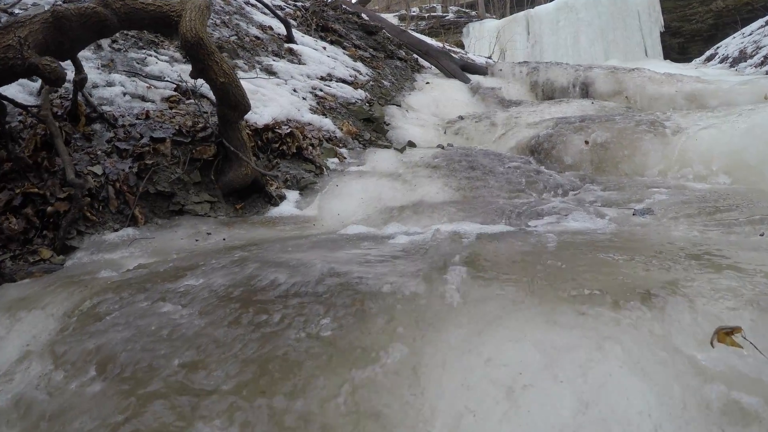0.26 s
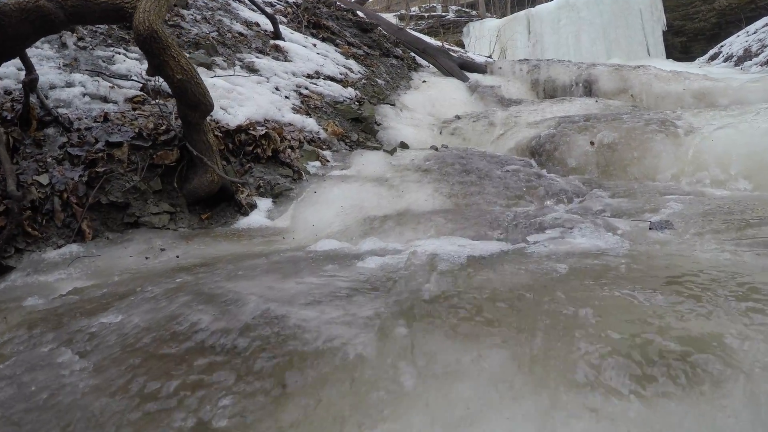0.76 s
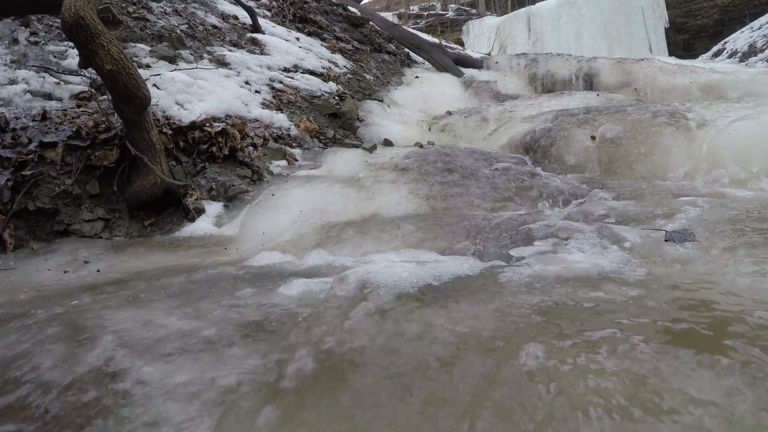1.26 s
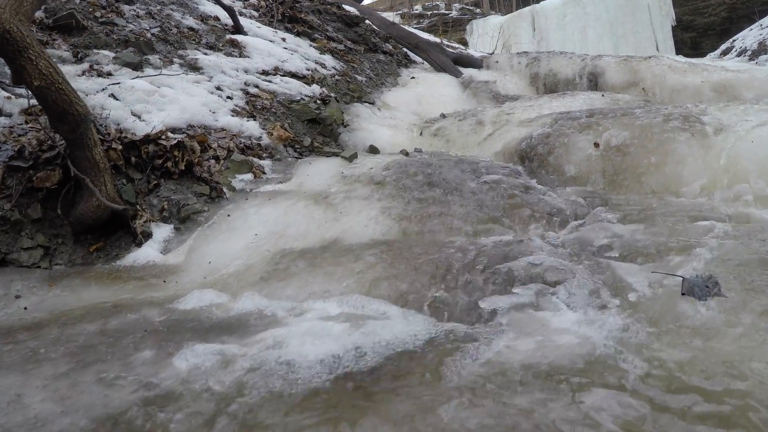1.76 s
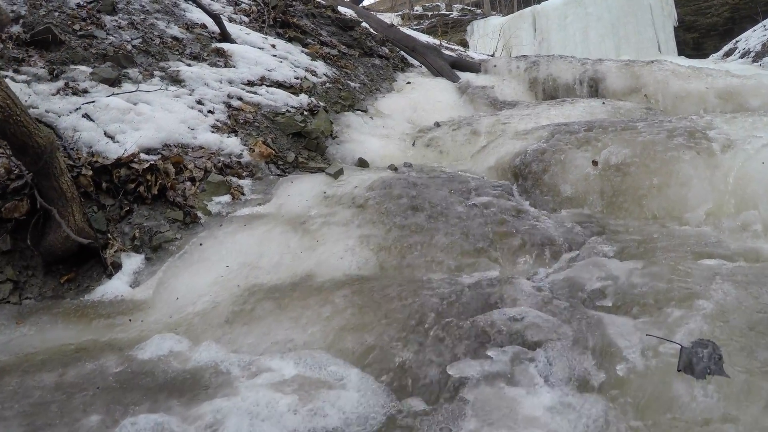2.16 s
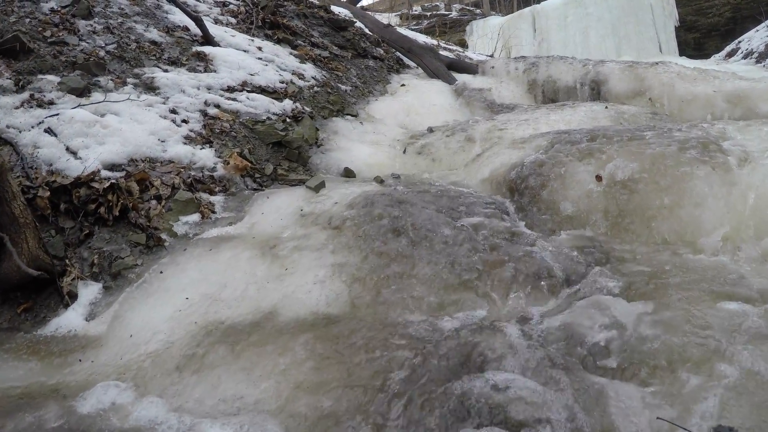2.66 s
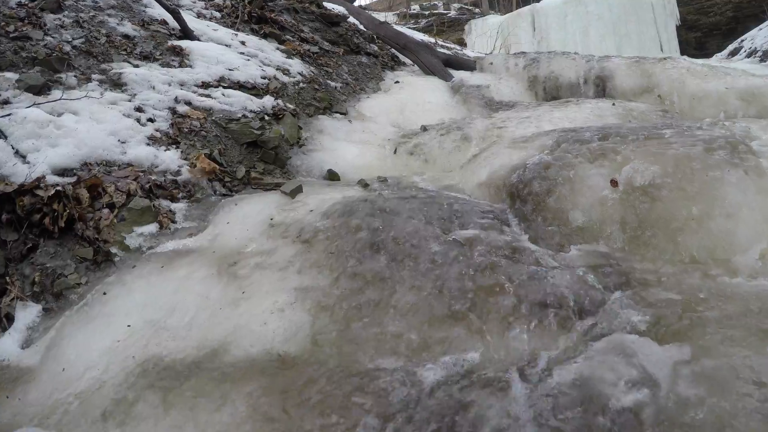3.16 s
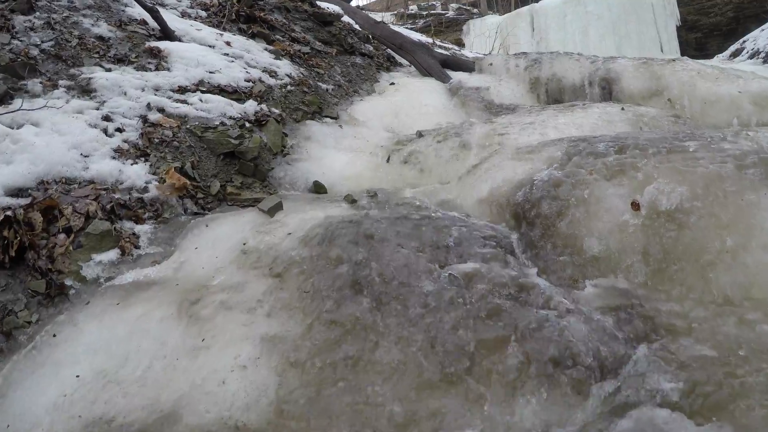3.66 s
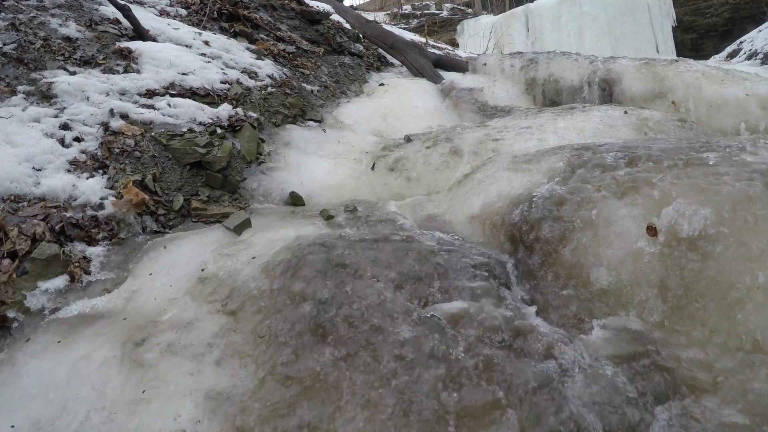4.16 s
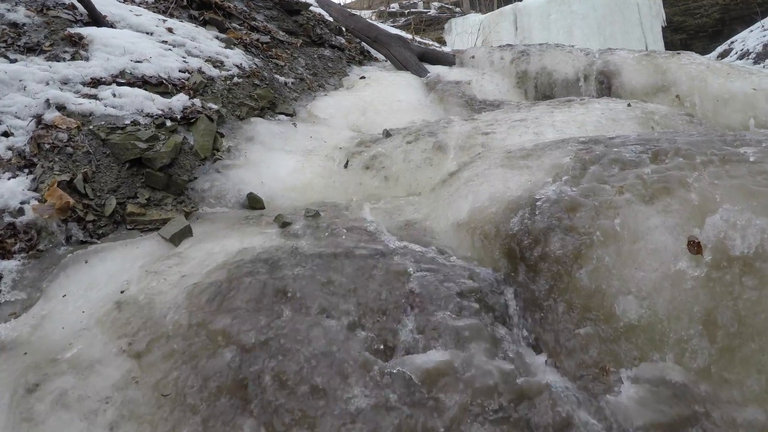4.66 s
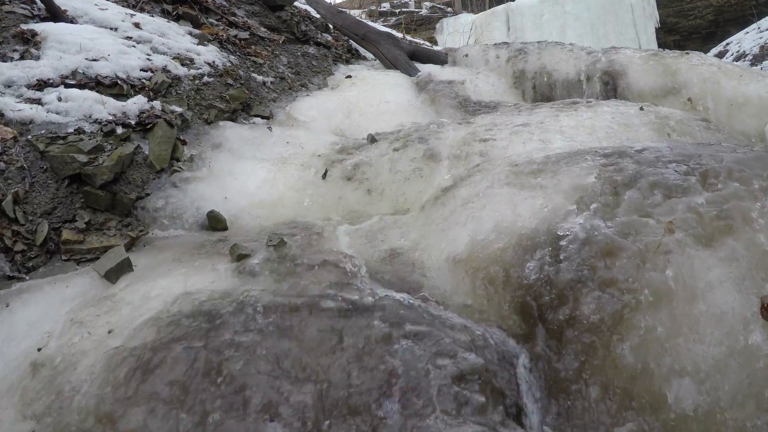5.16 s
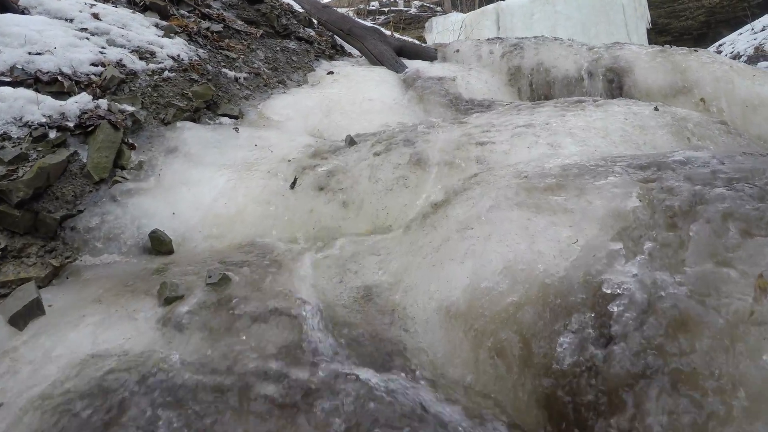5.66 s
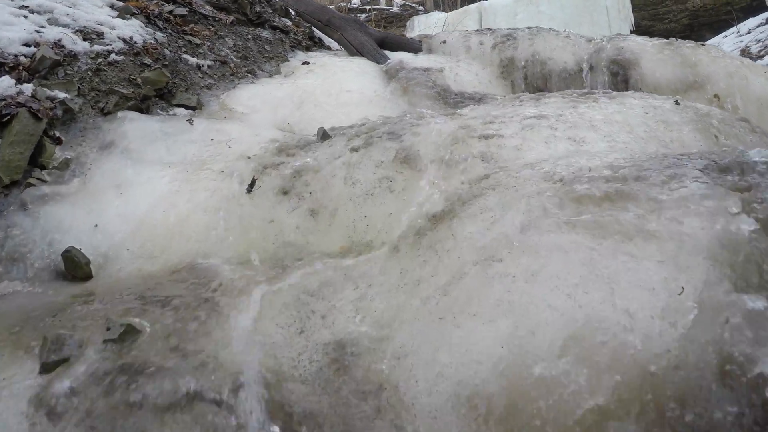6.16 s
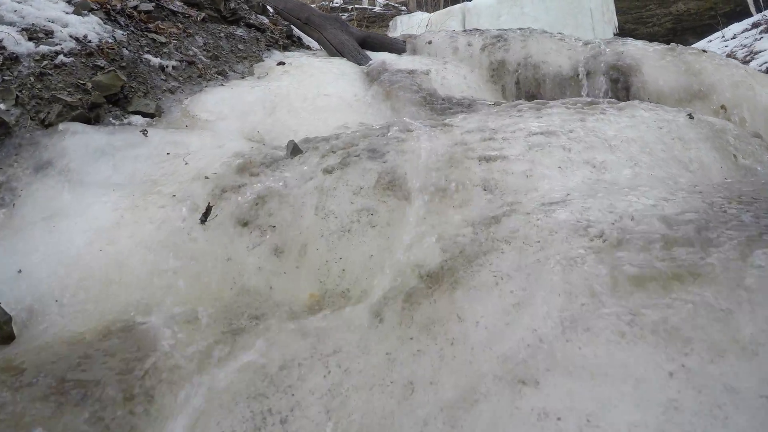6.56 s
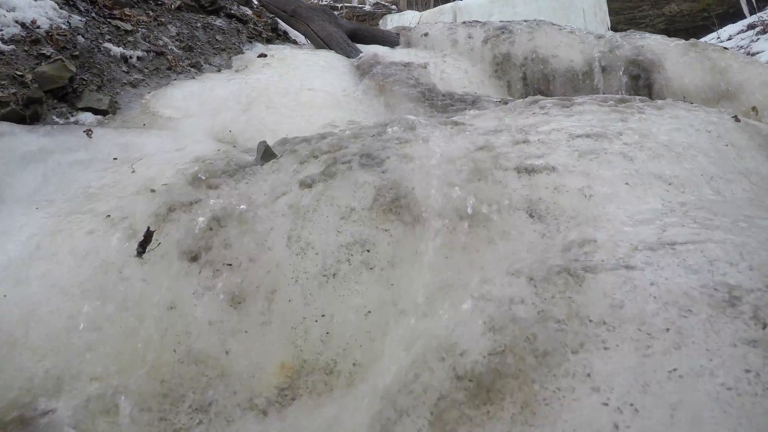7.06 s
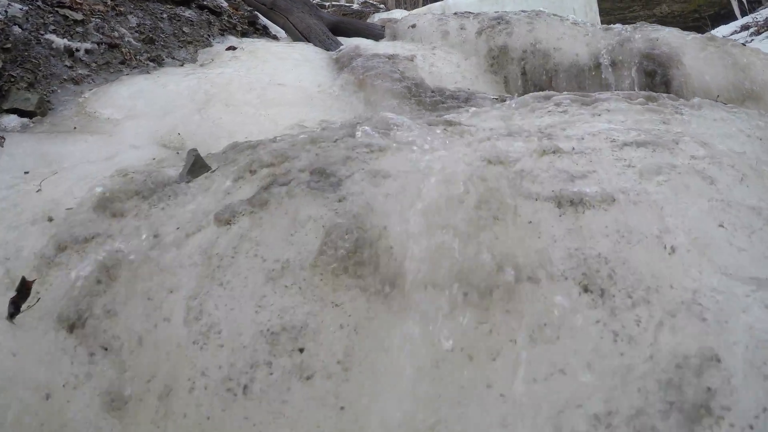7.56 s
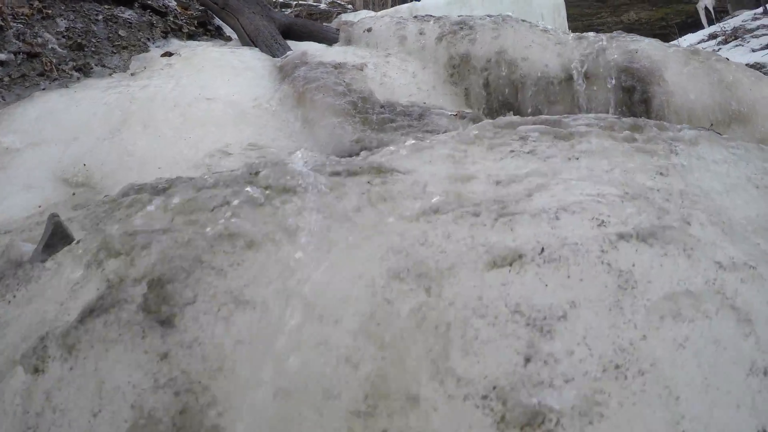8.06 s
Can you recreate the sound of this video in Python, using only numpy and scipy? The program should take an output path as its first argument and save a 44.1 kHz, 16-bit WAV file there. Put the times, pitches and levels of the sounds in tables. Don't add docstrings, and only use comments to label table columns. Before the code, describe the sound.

From 0 s, close meltwater rushes and trickles over ice: a dense bright wash around 1.5 to 6 kHz, a soft low gurgle, and thin airy spray on top. Bubbles ring as short rising plinks, and quick splashes come at 0.1, 0.6 and 0.85 s. The flow thins slightly around 1 to 2 s, with a solid hollow ice knock and splash at 1.6 s. Knocks and splashes bunch at 2.4 to 2.8 s, loudest at 2.8, then again near 3.1 s. Bright bubble plinks at 3.8 s lead to longer splashing from 4.2 to 4.5 s and another at 4.8 s. Steps strike at 5.5 and 5.9 s as a deep, lumpy rumble of falls grows. From 6 to 8.3 s the water is fuller; light thuds at 6.85 and 7.1 s precede a hard jolt and the biggest splash around 7.5 s, then rapid bubbling to the abrupt end. Close, dry, nearly mono; only extreme treble differs between sides.

```python
import sys
import numpy as np
from scipy import signal
from scipy.fft import rfft, irfft, next_fast_len
from scipy.io import wavfile
from scipy.ndimage import uniform_filter1d, map_coordinates

SR = 44100
rng = np.random.default_rng(int(sys.argv[2]) if len(sys.argv) > 2 else 0)


def decibels_to_gain(level_db):
    exponent = np.asarray(level_db, float) / 20
    return 10 ** exponent


def wav_record(signal):
    frames = np.transpose(np.atleast_2d(signal))
    bounded = np.clip(frames, -1, 1)
    quanta = np.round(bounded * 32767).astype(np.int16)
    wavfile.write(sys.argv[1], SR, quanta)


N = 367336


def unit(x):
    return x / np.sqrt(np.mean(x ** 2) + 1e-20)


def along(points, hz):
    f, v = np.transpose(points)
    return np.interp(np.log(hz + 1), np.log(f + 1), v, left=-120, right=-120)


def curves(rows):
    s, *cols = np.transpose(rows)
    return [np.interp(np.arange(N) / SR, s, c) for c in cols]


def wobble(rate):
    knots = rng.standard_normal(int(N * rate / SR) + 4)
    return map_coordinates(knots, [np.arange(N) * rate / SR])


def filtered(x, response):
    m = next_fast_len(N + 8192)
    return irfft(rfft(x, m) * response(np.fft.rfftfreq(m, 1 / SR)), m)[..., :N]


def noise(spectrum, patchy_db):
    z = signal.stft(rng.standard_normal(N + 512), nperseg=256)[2]
    field = uniform_filter1d(rng.standard_normal(z.shape), size=5, axis=0)
    field = uniform_filter1d(field, size=3, axis=1)
    x = signal.istft(z * decibels_to_gain(patchy_db * unit(field)), nperseg=256)[1][:N]
    return unit(filtered(x, lambda hz: decibels_to_gain(along(spectrum, hz))))


def chirps(s, db, hz, cycles, rise, size=400):
    t = np.arange(size) / SR
    u = t * (hz / cycles)[:, None]
    fade = np.cos(np.pi / 2 * t / t[-1])
    shape = (u / 0.33 * np.exp(1 - u / 0.25)) ** 1.18 * fade
    glide = 1 - rise[:, None] / 3 + rise[:, None] * u / 2
    wave = decibels_to_gain(db)[:, None] * shape * np.sin(2 * np.pi * hz[:, None] * t * glide)
    at = np.round(s * SR).astype(int)[:, None] + np.arange(size)
    return np.bincount(at.ravel(), wave.ravel(), N + size + SR)[:N]


def swarm(count, hz, spread, cycles, scatter_db, clump_db, size):
    a, b = rng.random((count, 3)), rng.standard_normal((count, 2))
    crowd = np.cumsum(decibels_to_gain(clump_db * (wobble(28) + .9 * wobble(7))))
    s = np.interp(a[:, 0], crowd / crowd[-1], np.arange(N) / SR)
    db = -scatter_db * np.log(a[:, 1] + 0.017)
    pitch = np.clip(hz * np.exp(spread * b[:, 0]), 100, SR / 2.6)
    lives = cycles * np.exp(0.44 * b[:, 1])
    return unit(chirps(s, db, pitch, lives, 0.41 * a[:, 2], size=size))


def whiten(x, spectrum):
    f, p = signal.welch(x, SR, nperseg=512)
    floor = 0.00061 * p.max()
    return unit(filtered(x, lambda hz: decibels_to_gain(along(spectrum, hz)) / np.sqrt(np.interp(hz, f, p) + floor)))


# frequency in Hz, level in dB per Hz.
GURGLE = [(90, -13), (135, 1), (170, 1.5), (220, -2.5), (340, -10), (410, -12), (500, -19), (600, -22),
          (730, -17.5), (860, -15.5), (1100, -22), (1250, -18.5), (1600, -42), (2700, -120)]
RUSH = [(680, -25.5), (1150, -17), (1240, -8), (1470, -1.5), (2570, -1), (3920, 0), (5780, -2),
        (8000, -16.5), (10400, -22), (17600, -120)]
SPRAY = [(4120, -8), (7000, -1), (7530, -3), (8670, -1.5), (11500, -10), (14200, -9.5), (15100, -14.5),
         (15600, -28)]


def creek():
    level = np.hypot(flow(), splashes())
    surge = 0.6 * wobble(14) + 0.75 * wobble(45)

    glugs = swarm(count=700, hz=689.3, spread=0.445, cycles=10.5, scatter_db=2.5, clump_db=2.5, size=1400)
    gurgle = 1.036 * noise(GURGLE, patchy_db=0.0) + 0.44 * whiten(glugs, GURGLE)
    gurgle = filtered(gurgle, housing)
    upper = filtered(gurgle, lambda hz: hz > 565)
    upper_level = level[0] ** .3 * level[1] ** .75 * decibels_to_gain(-1.2)
    gurgle = decibels_to_gain(0.51 * surge) * (level[0] * (gurgle - upper) + upper_level * upper)

    fizz = swarm(count=7000, hz=3506, spread=0.5485, cycles=16.2, scatter_db=3.0, clump_db=2.5, size=500)
    rush = 0.8 * noise(RUSH, patchy_db=1.7) + 0.64 * whiten(fizz, RUSH)
    dull = filtered(rush, lambda hz: 1 / (1 + (hz / 3500) ** 4))
    rush = decibels_to_gain(2 + 0.32 * surge) * (level[1] * dull + level[2] * (rush - dull))

    pops = swarm(count=1500, hz=12500, spread=0.207, cycles=17, scatter_db=2.0, clump_db=2.5, size=160)
    mist = np.array([noise(SPRAY, patchy_db=1.5), noise(SPRAY, patchy_db=3.0), whiten(pops, SPRAY)])
    return gurgle + rush, level[3] * decibels_to_gain(0.59 * surge + 0.23 * wobble(22)) * mist


# time in seconds, strength in dB, churn of deeper water in dB.
FLOW = [(0.0, -35, -1), (0.39, -34.5, 1), (0.95, -36.5, 1), (1.88, -37.5, 0.5), (3.5, -36, 0),
        (4.03, -35.5, -3.5), (4.5, -35, 1), (5.77, -35, -1.5), (6.03, -33.5, 0.5), (6.54, -34, 0.5),
        (7.07, -32.5, -0.5), (7.82, -31.5, -1.5), (8.33, -32.5, -1.5)]
# level in dB over the mean strength, dB per dB of strength, dB per dB of churn.
LAYERS = [
    (-9, .5, 1.),
    (-2, 1.16, .3),
    (-3.5, 0.88, -.2),
    (-18.5, 0.3, .05),
]


def flow():
    strength_db, churn_db = curves(FLOW)
    over_db, grows, churns = np.transpose(LAYERS)[:, :, None]
    mean_db = strength_db.mean()
    return decibels_to_gain(mean_db + over_db + grows * (strength_db - mean_db) + churns * churn_db)


# start in seconds, peak in dB, length in seconds, low slosh in dB.
SPLASHES = [(0.064, -19, .046, -7), (0.115, -17, .059, -13), (0.575, -13, .062, -9),
            (0.845, -23, 0.032, -6), (1.577, -15.5, 0.044, -5), (2.416, -17, .029, -27),
            (2.553, -15, 0.086, -16), (2.618, -19.5, 0.049, 1), (3.095, -16.5, 0.066, -3),
            (3.238, -18.5, 0.059, -23), (4.182, -28, .07, 5), (4.227, -15, 0.16, -6),
            (4.402, -20, 0.05, -4), (4.439, -16, 0.1, .5), (4.773, -21, .052, -5), (4.801, -19, .049, -7),
            (5.435, -16, 0.039, -11), (5.489, -14.5, 0.054, 1), (5.89, -16.5, 0.052, 2),
            (6.747, -17, .032, -8), (6.887, -19, 0.091, -3), (7.029, -17.5, 0.052, 0.5),
            (7.102, -15, 0.056, -1), (7.4, -13, 0.025, -15), (7.522, -9.5, 0.038, -6),
            (7.5714, -15, 0.011, 0.5), (7.682, -26, .028, -10), (7.815, -16, 0.069, -6.5),
            (8, -14.5, 0.029, -7), (8.24, -17, 0.064, -18)]


def splashes():
    out, t = np.zeros((4, N + SR)), np.arange(SR // 4) / SR
    for s, db, length, low_db in SPLASHES:
        u = t / (0.23 * max(length, .004))
        layer_db = np.array([[low_db], [-3], [-3], [-22.5]])
        out[:, round(s * SR):][:, :len(t)] += decibels_to_gain(db - 18.5 + layer_db) * u * np.exp(1 - u)
    return out[:, :N]


def snaps():
    grains = swarm(count=400, hz=6000, spread=0.205, cycles=8.1, scatter_db=0.5, clump_db=3, size=120)
    return decibels_to_gain(-18 + curves(FLOW)[0]) * filtered(grains, lambda hz: 1 / (1 + (hz / 8200) ** 6))


# start in seconds, peak in dB, pitch in Hz.
GULPS = [(.2463, -23, 2000), (0.357, -18, 1430), (.378, -26, 845), (.65, -28, 870), (.9368, -24, 2000),
         (1.3394, -18, 1520), (1.584, -18.5, 1650), (1.6344, -17, 2300), (2.771, -22, 1650),
         (2.803, -21.5, 1560), (3.073, -22, 1880), (3.238, -17.5, 2380), (3.4655, -21, 1910),
         (4.0137, -19.5, 1480), (4.213, -30, 830), (4.798, -18.5, 1960), (4.8324, -18, 2020),
         (5.2488, -17, 2900), (5.875, -15, 3160), (6.296, -15, 1630), (6.5919, -18, 2140),
         (6.7435, -16, 2400), (7.01, -28, 900), (7.289, -22, 1580), (7.531, -17, 1620), (7.678, -18, 1920),
         (7.893, -16, 1740), (7.9047, -17, 2690), (8.286, -19, 1440), (7.481, -19, 2130)]
# start in seconds, peak in dB, pitch in Hz.
BUBBLES = [(.0353, -10, 3770), (.138, -10, 5520), (0.1555, -6.5, 5460), (0.4336, -14.5, 3900),
           (1.586, -19, 4750), (2.7372, -12, 4530), (3.1155, -9.5, 3630), (3.8312, -17, 4600),
           (3.797, -8.5, 4300), (3.841, -12.5, 2550), (4.6463, -8, 4080), (5.0492, -10.5, 4000),
           (5.445, -12, 3500), (5.536, -14, 3910), (5.8995, -11, 3230), (6.063, -12, 4970),
           (3.1444, -14, 5800), (7.288, -10, 5000), (7.405, -12, 3530), (7.4819, -13, 3500),
           (7.5366, -8.5, 3040), (7.565, -11, 3400), (7.627, -7, 4130), (7.68, -9.5, 3720),
           (7.7337, -12, 4150), (7.9289, -11, 3400), (8.0012, -12.5, 3380), (8.0292, -5.5, 4300),
           (7.577, -9, 6000), (8.238, -8, 4320)]


def bubbles():
    s, db, hz = np.transpose(np.vstack([GULPS, BUBBLES, strays(count=60)]))
    near = rng.random((len(s), 3))
    cycles = np.where(np.arange(len(s)) < len(GULPS), 14.5, 13.5)
    first = chirps(s, db - 8.0, hz, cycles, 0.37 * near[:, 2], size=700)
    later, pitch = s + .004 * near[:, 0], hz * (0.753 + 0.43 * near[:, 1])
    return first + chirps(later, db - 11.0, pitch, cycles, 0.22 * near[:, 2], size=700)


def strays(count):
    a, b = rng.random((count, 2)), rng.standard_normal(count)
    pitch_hz = np.minimum(5000 * np.exp(0.275 * b), 6800)
    return list(zip(a[:, 0] * N / SR, -25 + 4 * a[:, 1], pitch_hz))


# start in seconds, peak in dB, centre in Hz.
TICKS = [(0.1301, -34, 12170), (0.4728, -31, 12500), (0.5841, -39, 12000), (0.6365, -40, 12300),
         (0.7188, -46, 12700), (0.848, -38, 12000), (0.9787, -41, 12500), (1.5863, -43, 11000),
         (2.4299, -33, 11500), (2.615, -32, 12900), (3.6631, -39, 11000), (4.0477, -42, 11900),
         (5.3009, -37, 12500), (5.4435, -47, 12300), (5.5039, -31, 13900), (5.8162, -39, 12300),
         (5.896, -34, 13400), (6.2337, -37, 12400), (6.6144, -43, 12200), (6.6588, -45, 12900),
         (6.8723, -46, 11500), (6.9311, -38, 12900), (7.0399, -31, 13700), (7.203, -50, 12500),
         (7.215, -42, 12800), (7.2744, -47, 12200), (7.3133, -36, 11900), (7.4435, -43, 12500),
         (7.5792, -37, 11900), (7.7538, -34, 12300)]


def ticks():
    out, t = np.zeros(N + SR), np.arange(SR // 40) / SR
    for s, db, hz in TICKS:
        grit = 0.14 + uniform_filter1d(rng.standard_normal(len(t)), size=16)
        decay = decibels_to_gain(db + 8.5 - 60 * t / 0.018)
        out[round(s * SR):][:len(t)] += decay * grit * np.sin(2 * np.pi * hz * t)
    return out[:N]


# start in seconds, peak in dB, pitch in Hz, crack in dB.
KNOCKS = [(0.599, -30, 163, -14), (3.087, -27, 232, -9), (1.586, -13, 166, -20), (2.044, -33, 210, -9),
          (2.592, -27, 260, -24), (2.605, -23, 322, -23), (2.615, -19.5, 284, -21),
          (2.771, -18.5, 235, -19), (2.8023, -12, 184, -18.5), (3.109, -18.5, 214, -19),
          (3.375, -28, 274, -21), (3.44, -27, 197, -29), (3.531, -23, 198, -48), (4.0141, -19, 202, -16),
          (4.251, -39, 172, -6), (4.298, -27.5, 314, -13), (4.49, -30, 170, -12), (4.697, -29, 258, -20),
          (4.755, -22.5, 181, -30), (4.793, -28, 260, -15), (5.461, -28, 175, -32),
          (5.501, -26.5, 170, -15), (5.903, -17, 211, -21), (6.845, -26, 131, -16.5),
          (7.035, -26, 196, -19), (7.104, -29, 132, -27), (7.539, -27, 173, -23), (7.577, -18.5, 248, -17)]
# frequency in Hz, level in dB per Hz.
CRACK = [(260, -24), (450, -16), (837, -5.5), (1100, -27), (1540, -8), (2000, -27), (3430, -15),
         (3810, -34), (4680, -34), (6170, -18), (7000, -28), (9100, -56), (15400, -120)]


def knocks():
    ring, crack, t = np.zeros(N + SR), np.zeros(N + SR), np.arange(SR // 5) / SR
    slab = decibels_to_gain(-8.5) * np.sin(2 * np.pi * 332 * t)
    u = t / 0.00038
    push = u * (2 - u) * np.exp(-u)
    for s, db, hz, crack_db in KNOCKS:
        t60 = 0.026 * (1 + 0.0213 * (-14 - db)) * (hz / 200) ** -.5
        at = round((s + 0.0014) * SR)
        modes = np.sin(2 * np.pi * hz * t) + slab
        ring[at:at + len(t)] += decibels_to_gain(db + 5.5 - 60 * t / t60) * (1 - np.exp(-t / 0.0026)) * modes
        ring[at + 60:at + 60 + len(t)] += decibels_to_gain(db + crack_db + 15) * push
        burst = (1 - np.exp(-t / 0.00095)) * rng.standard_normal(len(t))
        crack[at:at + len(t)] += decibels_to_gain(db + crack_db + 34 - 60 * t / 0.02) * burst
    return ring[:N] + filtered(crack[:N], lambda hz: decibels_to_gain(along(CRACK, hz)))


# start in seconds, peak in dB, pitch in Hz.
JOLTS = [
    (5.902, -28, 120),
    (6.848, -22, 129),
    (7.105, -26, 125),
    (7.546, -17, 124),
    (7.582, -15, 111),
]


def jolts():
    out, t = np.zeros(N + SR), np.arange(SR // 8) / SR
    t60_s, rise_s = 0.05, 0.0034
    for s, db, hz in JOLTS:
        envelope = decibels_to_gain(db + 1.5 - 60 * t / t60_s) * (1 - np.exp(-t / rise_s))
        out[round(s * SR):][:len(t)] += envelope * np.sin(2 * np.pi * hz * t)
    return out[:N]


# time in seconds, level in dB.
RUMBLE = [(0.0, -48), (0.32, -59.5), (1.48, -67), (1.97, -51), (2.6, -60), (3.06, -53), (3.11, -45),
          (4.38, -51), (4.8, -42), (4.82, -47.5), (6.12, -38.5), (7.35, -38), (7.56, -35), (7.66, -37.5),
          (8.28, -34.5), (8.33, -39)]
# frequency in Hz, level in dB per Hz.
DEEP = [(8.8, -66), (17, -7), (32, 0), (86, -3.5), (130, -9), (170, -32), (290, -120)]


def rumble():
    return decibels_to_gain(curves(RUMBLE)[0] + 0.86 * wobble(8.1)) * noise(DEEP, patchy_db=0.2)


def housing(hz):
    def notch(centre, width):
        return 1 - .74 * np.exp(-((hz - centre) / width) ** 2)
    return notch(560, 55) * notch(1100, 80) / (1 + (132 / (hz + 1)) ** 18)


def scene():
    water, (shared, other, pops) = creek()
    drops = 0.46 * pops + ticks()
    shared = 0.92 * shared + 0.49 * drops

    def top(hz):
        return hz > 11850
    left = filtered(0.13 * other - 0.063 * shared - 0.36 * drops, top)
    right = filtered(1.25 * other - 0.92 * shared + 0.98 * drops, top)
    close = filtered(bubbles() + knocks(), housing)
    return water + shared + rumble() + jolts() + snaps() + close + np.array([left, right])


def roll_off(x):
    return signal.sosfilt(signal.butter(12, 15730, fs=SR, output="sos"), x)


def record(dry):
    return roll_off(dry)


dry = scene()
out = record(dry)
wav_record(out)
```